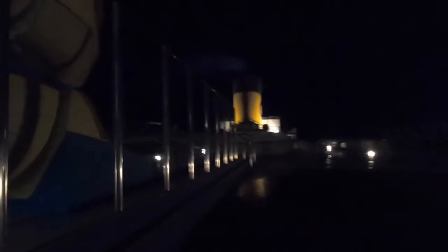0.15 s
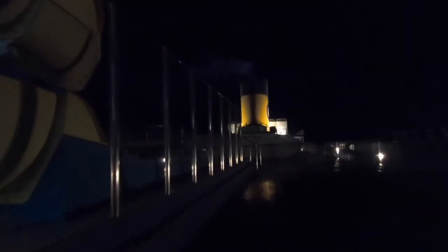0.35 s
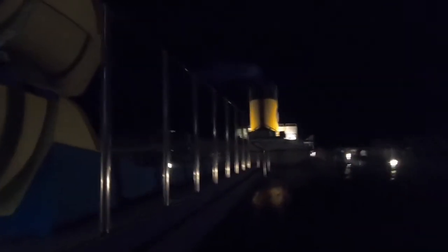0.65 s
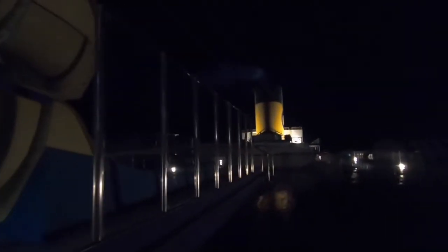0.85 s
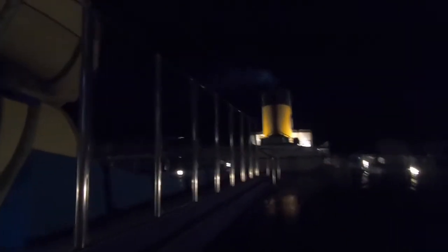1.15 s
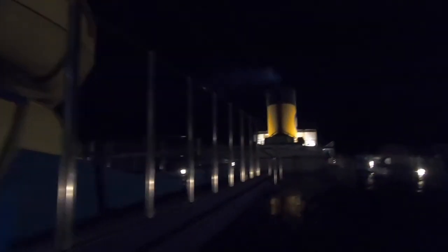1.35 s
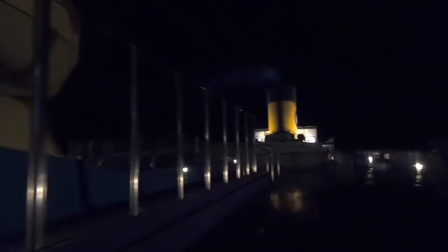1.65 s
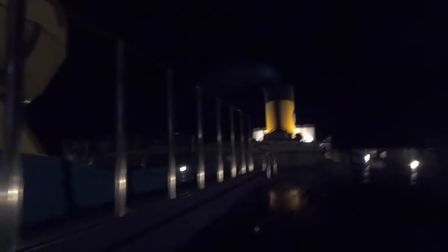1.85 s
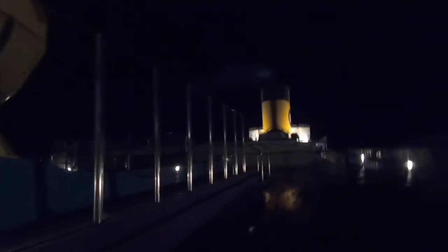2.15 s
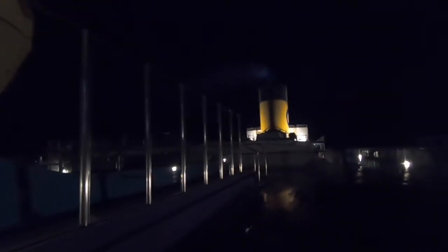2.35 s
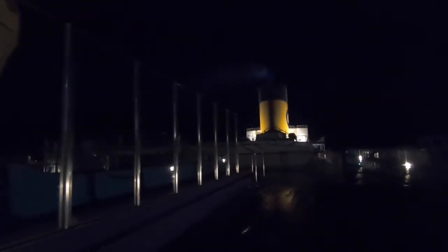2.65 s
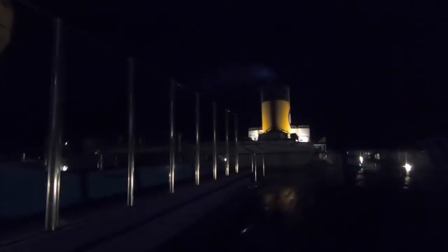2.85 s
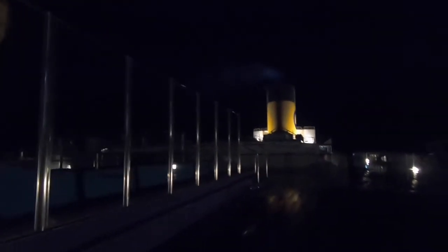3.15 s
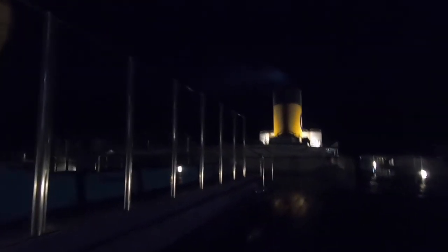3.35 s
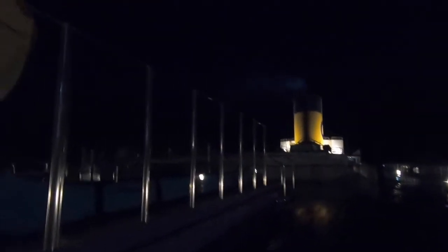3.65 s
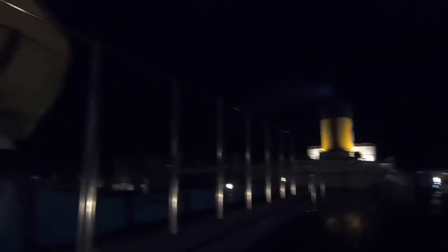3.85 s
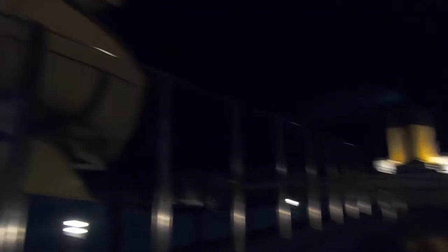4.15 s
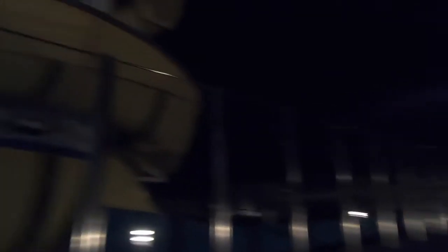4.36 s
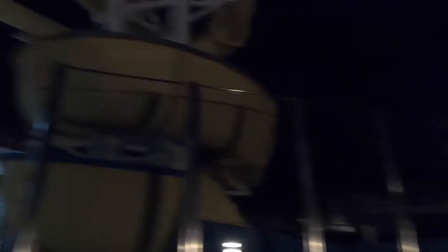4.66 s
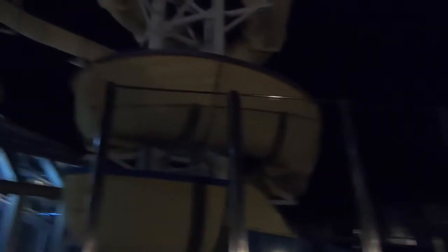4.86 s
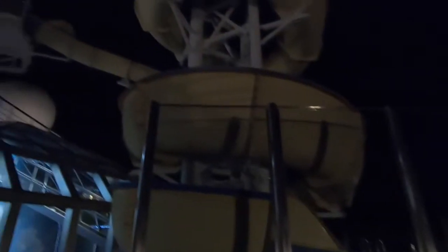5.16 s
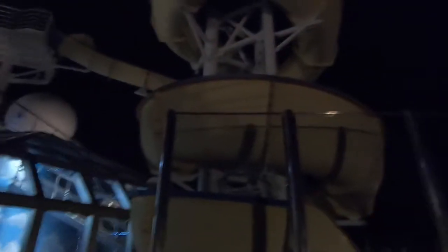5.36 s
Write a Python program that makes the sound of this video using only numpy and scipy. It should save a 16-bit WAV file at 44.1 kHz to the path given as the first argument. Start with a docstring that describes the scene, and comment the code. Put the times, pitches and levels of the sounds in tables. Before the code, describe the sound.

Outdoors on a ship's deck at night, a continuous low rumble of wind presses on the close handheld microphone, nearly centred, mixed with a deep engine throb and low machinery hums that waver gently. Behind it are a soft wide wash of water and very faint air hiss, swelling in small gusts. Small dull knocks, very short and close, come around 0.2 to 0.5 s and again at 1.0 to 1.2 s, with another faint tick at 2.7 s. A hollow airy roar swells subtly between about 2 and 3.7 s. Another knock falls at 3.9 s, and around 4 s the upper wash dulls slightly as the microphone turns inboard. After a light tap at 4.75 s, a firmer knock at 4.9 s leads straight into a tiny, piercing, scraping squeak, with a metallic ring and echo fading within half a second. Rumble continues to 5.5 s, with one last faint tick.

```python
"""Open deck of a ship under way, at night: wind rumbles on the microphone over the drone of the engines.
Low noise with a few short low pulses makes the wind rumble; wavering sines make the engines.
Shaped noise makes the hiss of air and water and the hollow roar; a few damped knocks sound close by.
Near the end something, perhaps a shoe sole, lands and squeaks once: gliding tones and scraping noise,
with steel fittings that ring on and an echo from the superstructure."""
import sys
import numpy as np
from scipy import signal
from scipy.fft import rfft, irfft, next_fast_len
from scipy.io import wavfile
from scipy.ndimage import uniform_filter1d

SR = 44100
rng = np.random.default_rng(int(sys.argv[2]) if len(sys.argv) > 2 else 0)


def store_wav(level_fs):
    """Save 16-bit WAV to argv[1]."""
    pcm = np.round(np.clip(np.atleast_2d(level_fs), -1, 1) * 32767)
    wavfile.write(sys.argv[1], SR, pcm.T.astype(np.int16))


N = 243401
T = np.arange(N) / SR


def undb(db):
    """Decibels to gain."""
    return 10 ** (np.asarray(db) / 20)


def unit(x):
    """Scale to rms 1."""
    return x / np.sqrt(np.mean(x ** 2))


def curve(rows, axis=1):
    """One column of a time table, joined by straight lines."""
    rows = np.array(rows)
    return np.interp(T, rows[:, 0], rows[:, axis])


def colour(x, points):
    """Filter by a (freq_hz, level_db) spectrum, joined by straight lines over log frequency."""
    hz, db = np.transpose(points)
    size = next_fast_len(N)
    f = np.maximum(np.fft.rfftfreq(size, 1 / SR), 1)
    gain = undb(np.interp(np.log(f), np.log(hz), db))
    return irfft(rfft(x, size) * gain, size)[..., :N]


def low_pass(x, order, hz):
    """Take off the treble above a corner frequency."""
    return signal.sosfilt(signal.butter(order, hz, fs=SR, output="sos"), x)


def resonate(x, hz, width_hz):
    """A single resonance, gain 1 at its centre."""
    return signal.lfilter(*signal.iirpeak(hz, hz / width_hz, fs=SR), x)


def walk(rate):
    """Smooth random wandering, rms 1, from random steps at a rate in Hz."""
    k = int(SR / rate)
    steps = np.repeat(rng.standard_normal(N // k + 2), k)
    smooth = uniform_filter1d(uniform_filter1d(steps, k), k)
    return unit(smooth[:N])


def noise(channels=1):
    """Unrelated white noises."""
    return rng.standard_normal((channels, N))


def place(x, pan_db):
    """Set a sound between the ears, left minus right in dB."""
    return x * undb(np.array([[pan_db], [-pan_db]]) / 2)


def burst(start, rise, decay):
    """A quick rise and exponential fall, times in seconds."""
    age = np.maximum(T - start, 0)
    return (1 - np.exp(-age / rise)) * np.exp(-age / decay)


def passing(passed_s, reach_s):
    """Nearness, 0 to 1, of a spot on the deck that the microphone is carried past."""
    return np.exp(-((T - passed_s) / reach_s) ** 2)


# rumble of wind and hull at the microphone: freq_hz, level_db (per Hz)
RUMBLE_SPECTRUM = [(12, -16), (22, -7.5), (30, -3), (50, -1), (100, -3), (150, -2), (190, -8), (245, -14),
                   (280, -17), (350, -16.5), (430, -22), (740, -27), (950, -37.5), (2800, -45.5),
                   (5000, -63.5), (12000, -92.5)]


def wind(level_db=-35.5, waver_db=0.58, apart_db=-23):
    """Eddies press on both microphone ports nearly alike, wavering a little in strength."""
    shared, apart = unit(colour(noise(channels=2), RUMBLE_SPECTRUM))
    eddies = shared + undb(apart_db) * np.array([apart, -apart])
    return eddies * undb(level_db + waver_db * walk(14))


# a few short low pulses within the steady wind rumble: middle_s, centre_hz, peak_db
PULSE_EVENTS = [(.985, 286, -41), (1.775, 32, -28.5), (2.165, 135, -23.5), (2.48, 280, -36),
                (3.809, 45.4, -27.5), (4.0, 248, -32.5)]


def low_pulses(cycles=0.91):
    """Each pulse is one short push and pull of pressure, a cosine under a bell-shaped envelope."""
    out = 0
    for middle, hz, db in PULSE_EVENTS:
        turns = (T - middle) * hz
        out = out + undb(db) * np.cos(2 * np.pi * turns) * np.exp(-(turns / cycles) ** 2)
    return out


# slow uneven wavering of the low engine throb: time_s, level_db
THROB_LEVELS = [(0, -37.5), (.25, -37), (.7, -45), (1.0, -40), (1.55, -45), (1.9, -39), (2.7, -42),
                (3.3, -35), (4.3, -42), (4.85, -36), (5.5, -37)]
# engine and fan tones, each loudest at its own spot along the deck: pitch_hz, level_db, passed_s
MACHINE_TONES = [(24.7, -38, 0.8), (113.65, -41, 2.16), (135.6, -41, 0.74), (161.7, -42, 0.92),
                 (157.4, -43, 3.6), (157.6, -41.5, 5.08), (208.2, -53, 2.4), (246.8, -53, 4.7),
                 (316.6, -53, 2.85), (636, -64, 3.4), (753, -64, 3.8)]


def engines(throb_hz=37.9, waver_db=0.63, flutter=0.45, drift_hz=1.69, away_db=-10, reach_s=0.68):
    """A deep throb and higher machinery tones, wavering as the air moves."""
    t = T[::32]  # pitch and level move slowly, so a coarse clock is enough

    def wander(rate):
        """Random levels joined by straight lines."""
        knots = np.arange(0, t[-1] + 1, 1 / rate)
        return np.interp(t, knots, rng.standard_normal(len(knots)))

    def tone(hz, db):
        """One line that drifts in pitch and flutters in level."""
        drift = np.cumsum(drift_hz * wander(4)) * t[1]
        cycles = hz * t + drift + rng.random()
        level = undb(np.interp(t, T, db) + waver_db * wander(3.06))
        size = level * (1 + flutter * wander(14))
        return np.sqrt(2) * np.sin(2 * np.pi * np.interp(T, t, cycles)) * np.interp(T, t, size)

    out = tone(throb_hz, curve(THROB_LEVELS))
    for hz, db, passed in MACHINE_TONES:
        out = out + tone(hz, db + away_db * (1 - passing(passed, reach_s)))
    return out


# small knocks close by; the last three rows are the landing just before the squeak:
# start_s, thud_hz, thud_db, ping_hz, ping_db, tick_db
KNOCK_EVENTS = [(.161, 650, -34, 2400, -62, -66), (.253, 320, -27, 2500, -53, -49),
                (.265, 765, -34, 2400, -63, -66), (.4535, 600, -53, 4400, -60, -53.5),
                (.514, 800, -35.5, 2390, -66, -64), (1.0318, 520, -28.5, 880, -28, -62),
                (1.1108, 1260, -31.5, 1750, -32, -66), (1.208, 600, -56, 3450, -45, -65),
                (2.705, 700, -46, 4400, -55, -47), (3.9048, 1000, -37.5, 2980, -47, -46.5),
                (4.752, 790, -36, 2400, -61, -70), (5.329, 600, -56, 7000, -57, -54.5),
                (4.9043, 520, -27, 1500, -39, -52), (4.9061, 500, -22, 5120, -31, -39),
                (4.9064, 1050, -32, 4450, -31, -44)]
# colour of a contact's tick: freq_hz, level_db
TICK_SPECTRUM = [(1000, -2.5), (3500, 7.5), (6300, -2), (8500, -7.5), (11000, -8.5), (14000, -20.5)]


def knocks(pitched=0.82, dull=0.33, thud_decay_s=.0017, ping_decay_s=.0011, tick_decay_s=.001):
    """Each contact gives a damped thud, a brief ping and a sharp tick."""
    out = np.zeros(N)
    age = T[:2048]
    attack = 1 - np.exp(-age / .0005)
    grit = unit(colour(noise()[0], TICK_SPECTRUM))
    for start, hz, thud_db, ping_hz, ping_db, tick_db in KNOCK_EVENTS:
        first = int(start * SR)
        span = slice(first, first + len(age))
        band = signal.butter(4, [hz / 2, hz * 1.7], "band", fs=SR, output="sos")
        body = unit(signal.sosfilt(band, rng.standard_normal(len(age))))
        thud = (pitched * np.sin(2 * np.pi * hz * age) + dull * body) * np.exp(-age / thud_decay_s)
        ping = np.sin(2 * np.pi * ping_hz * age) * np.exp(-age / ping_decay_s)
        tick = grit[span] * np.exp(-age / tick_decay_s)
        out[span] += attack * (thud * undb(thud_db) + ping * undb(ping_db) + tick * undb(tick_db))
    return out


# slips of the squeak: start_s, length_s, start_pitch_hz, end_pitch_hz, tone_db, scrape_db
SLIP_EVENTS = [(4.9176, 0.007, 3660, 3680, -31, -43.5), (4.9271, 0.0047, 2920, 3200, -37.5, -41),
               (4.9282, 0.0064, 2049, 2234, -42.5, -54), (4.929, 0.0085, 3765, 3660, -36.5, -51)]
# resonances of the rubbed surface: freq_hz, width_hz, level_db
SOLE_RESONANCES = [(2180, 120, 3.5), (2510, 110, 6), (3150, 250, 2), (3630, 180, 0), (4000, 150, 1),
                   (5000, 900, -20), (6400, 1600, -26), (10000, 3000, -24)]


def squeak(jitter=0.0145, octave_db=-22):
    """Stick-slip: in each few-millisecond slip the sole sings a gliding tone and scrapes."""
    out = 0
    for start, length, from_hz, to_hz, tone_db, scrape_db in SLIP_EVENTS:
        progress = np.clip((T - start) / length, 0, 1)
        grip = np.sqrt(4 * progress * (1 - progress))  # rounded rise and fall
        pitch = (from_hz + (to_hz - from_hz) * progress) * (1 + jitter * walk(900))
        phase = 2 * np.pi * np.cumsum(pitch) / SR
        tone = np.sqrt(2) * (np.sin(phase) + undb(octave_db) * np.sin(2 * phase))
        grit = colour(noise(), [(1400, -7), (2100, 8.0), (4000, 10), (12000, -11.0)])
        scrape = unit(sum(undb(db) * resonate(grit, hz, width) for hz, width, db in SOLE_RESONANCES))
        out = out + grip * (tone * undb(tone_db) + scrape * undb(scrape_db))
    return out


def shrill_modes(level_db=-29):
    """A close pair of high modes rings briefly during the squeak."""
    pair = sum(np.sin(2 * np.pi * hz * T) for hz in (9870, 10500))
    return pair * burst(4.9215, 0.0022, 0.0015) * undb(level_db)


# bright rasp of the rubbing, radiated away along the deck: freq_hz, level_db
RASP_SPECTRUM = [(500, -7), (1300, -2), (2100, -2), (3000, 3), (4200, -2.5), (6500, -1), (8000, -8),
                 (9500, -4), (12000, -4), (14500, -15)]


def rasp(db=-40, middle_s=4.9225, spread_s=0.0091):
    """Broad friction noise that swells and dies around the squeak; direct and echo gains come later."""
    swell = np.exp(-.5 * ((T - middle_s) / spread_s) ** 2)
    return unit(colour(noise(), RASP_SPECTRUM)) * swell * undb(db)


# rings the squeak leaves in the deck fittings, led by a close beating pair: pitch_hz, level_db, t60_s
FITTING_RINGS = [(2020, -57, .28), (2230, -63, .45), (2600, -65, .45), (2900, -67, 0.38), (3117, -64, .45),
                 (3425, -60, .4), (3658, -54, 0.44), (3718, -54, 0.38), (3840, -59, .35), (4062, -63, .43),
                 (6300, -69, .55)]


def fittings(start_s=4.919, rise_s=.006, waver_db=0.5):
    """Steel fittings take up the squeak and sing on after it."""
    out = 0
    for hz, db, t60 in FITTING_RINGS:
        tone = np.sqrt(2) * np.sin(2 * np.pi * (hz * T + rng.random()))
        ring = burst(start_s, rise_s, t60 / np.log(1000))
        out = out + tone * ring * undb(db + waver_db * walk(60))
    return out


# colour of the echo from the steel around the deck: freq_hz, level_db
ECHO_SPECTRUM = [(300, -3.5), (1200, -8), (2100, -1), (2700, -10.5), (3200, -4), (3700, -5.5), (4200, -2.5),
                 (5000, -5.5), (6500, -1), (8200, -1.5), (9500, -1), (12000, -6.5), (14500, -13)]


def deck(x, t60=0.5, echo_db=-10.5, early_db=-4, early_t60=0.3):
    """Steel walls return a dense echo, the sum of a faster and a slower decay (t60 in seconds)."""
    fade = undb(-60 * T / t60) + undb(early_db) * undb(-60 * T / early_t60)
    onset = np.clip(T / 0.0036, 0, 1)
    response = colour(noise(channels=2), ECHO_SPECTRUM) * fade * onset
    # the air takes the treble out of the later reflections
    dull = low_pass(response, 2, 10500)
    fresh = np.exp(-T / 0.2)
    response = fresh * response + (1 - fresh) * dull
    response = response / np.sqrt(np.sum(response ** 2) / 2)
    return undb(echo_db) * signal.fftconvolve(x, response, axes=1)[:, :N]


def turn_inboard(middle_s=4.03, length_s=.25, turn_db=-2):
    """Gain that slides down as the microphone turns inboard."""
    return undb(turn_db * np.clip((T - middle_s) / length_s + .5, 0, 1))


# wash of water along the hull, unrelated left and right: freq_hz, level_db (per Hz)
WASH_SPECTRUM = [(88, -28.5), (150, -1.5), (270, -10), (309, -8.5), (402, -7.5), (739, -6), (1080, -9),
                 (1350, -9.5), (1870, -14), (2540, -18), (3570, -24.5), (5220, -28.5), (7770, -32.5),
                 (9580, -28), (12300, -40.5), (14000, -59)]


def water(shade, level_db=-53.5, spot_db=-0.5, flicker_db=0.64, dull_hz=6000, shade_hz=1400):
    """Diffuse water noise with soft treble; turning inboard shades its upper part."""
    wash = unit(colour(noise(channels=2), WASH_SPECTRUM))
    wash = low_pass(wash, 3, dull_hz)
    low = low_pass(wash, 1, shade_hz)
    shaded = low + shade * (wash - low)
    # one stretch of deck, passed near 1.8 s, is very slightly quieter
    return shaded * undb(level_db + spot_db * passing(1.8, 0.62) + flicker_db * walk(12))


# gusts, each a swell of fine hiss: peak_s, length_s, level_db
GUST_EVENTS = [(0.082, .3, -68.5), (0.256, 0.15, -67), (0.51, 0.36, -68.5), (1.038, 0.38, -68.5),
               (1.238, 0.42, -70.5), (2.0, 0.45, -67.5), (2.732, 0.33, -66), (2.997, 0.26, -71.5),
               (3.756, 0.53, -71), (4.04, 0.16, -68.5)]


def gusts(calm_db=-80.5, rise_share=0.34):
    """Strength of the hiss: every gust builds quickly and ebbs more slowly, and their powers add."""
    power = undb(calm_db) ** 2
    for peak, length, db in GUST_EVENTS:
        reach = length * np.where(T < peak, rise_share, 1 - rise_share)
        power = power + undb(db) ** 2 * np.exp(-2 * ((T - peak) / reach) ** 2)
    return np.sqrt(power)


# fine hiss of the air: freq_hz, level_db (per Hz)
AIR_SPECTRUM = [(1500, -9.5), (3000, 8.5), (5500, 4), (7500, -4), (10000, -2.5), (12500, -14),
                (14500, -25.5)]


def hiss():
    """Moving air makes a fine noise that follows the gusts, stronger on the right."""
    air = unit(colour(noise(channels=2), AIR_SPECTRUM))
    return place(air * gusts(), pan_db=-4)


def whistle(shade, level_db=-77):
    """A faint breezy whistle: noise in one narrow resonance, softer after the turn inboard."""
    return unit(resonate(noise(), 4420, 240)) * shade * undb(level_db)


# swells of a hollow roar of air: peak_s, reach_s (either side), level_db
ROAR_EVENTS = [(.22, 0.1, -56), (2.1, 0.26, -54), (2.64, .15, -52.5), (3.1, .25, -56), (3.62, .2, -56)]
# colour of the roar: freq_hz, level_db (per Hz)
HOLLOW_SPECTRUM = [(250, -19.5), (550, -6), (700, -1), (860, -0.5), (1000, -19), (3000, -49.5),
                   (9000, -80.5)]


def roar():
    """A hollow roar of air, perhaps over a vent or the railing, swells and recedes."""
    power = sum(undb(db) ** 2 * passing(peak, reach) for peak, reach, db in ROAR_EVENTS)
    return unit(colour(noise(channels=2), HOLLOW_SPECTRUM)) * np.sqrt(power)


def scene(rasp_direct_db=-9, rasp_echo_db=7):
    """The bed of wind, engines and water, with near sounds towards the right and their echo all round."""
    near = squeak() + fittings() + knocks()
    rubbing = rasp()
    shade = turn_inboard()
    bed = place(wind() + low_pulses() + engines(), pan_db=-.5)
    bed = bed + place(water(shade) + hiss() + whistle(shade) + roar(), pan_db=.7)
    direct = place(near, pan_db=-.6) + place(shrill_modes(), pan_db=-15)
    direct = direct + place(rubbing * undb(rasp_direct_db), pan_db=-24.5)
    echo = place(deck(near + rubbing * undb(rasp_echo_db)), pan_db=-1.5)
    return bed + direct + echo


def record(dry, top_hz=14200):
    """A short fade-in lets the sound begin without a click; a steep filter cuts the top."""
    fade = np.clip(T / .006, 0, 1)
    return signal.sosfilt(signal.ellip(8, .2, 80, top_hz, fs=SR, output="sos"), dry * fade)


dry = scene()
out = record(dry)
store_wav(out)
```